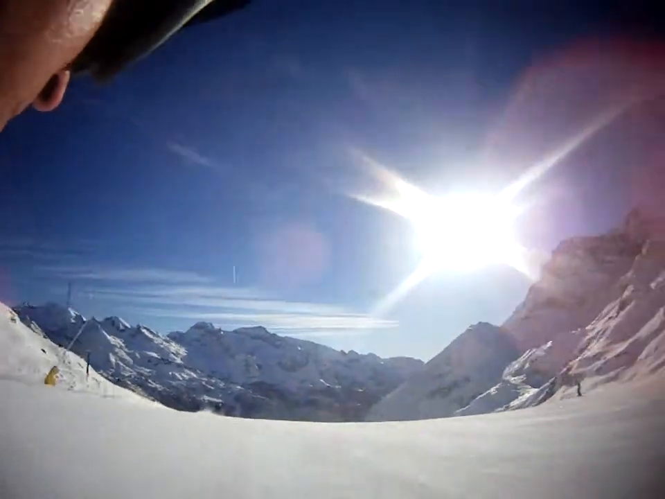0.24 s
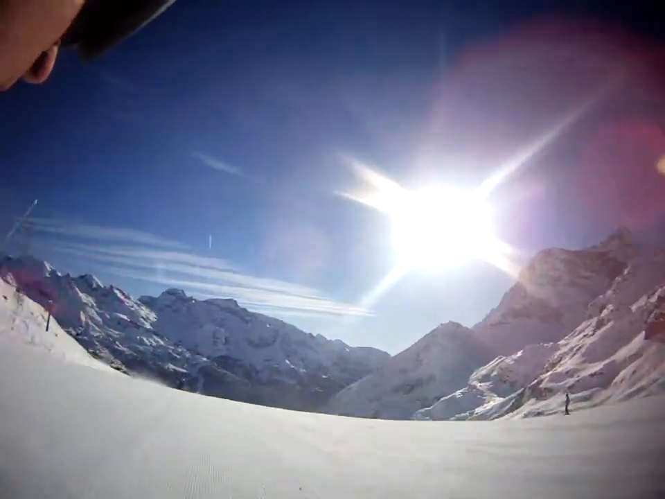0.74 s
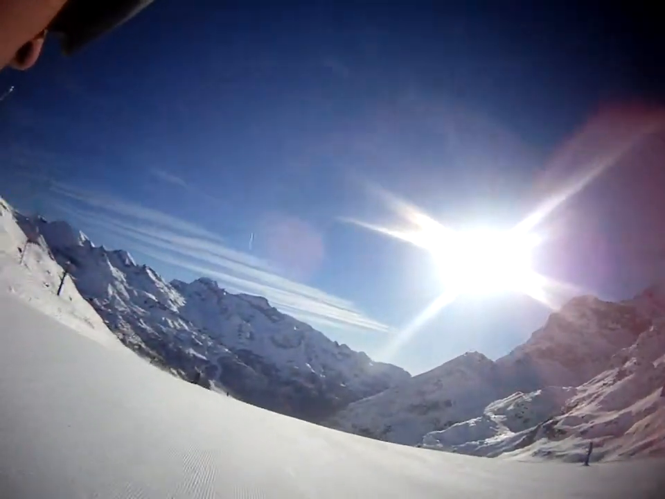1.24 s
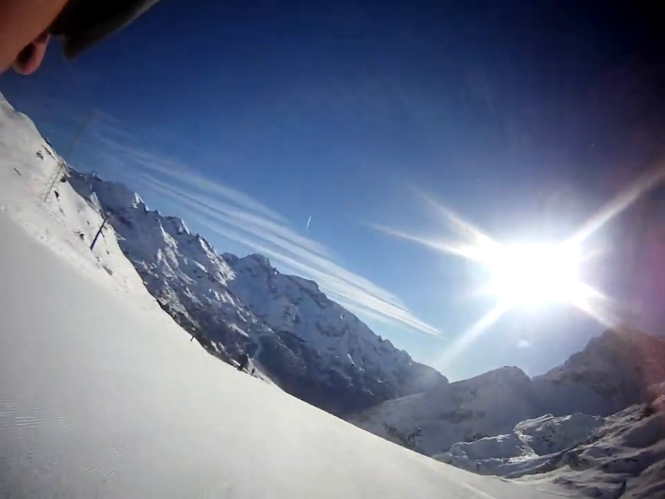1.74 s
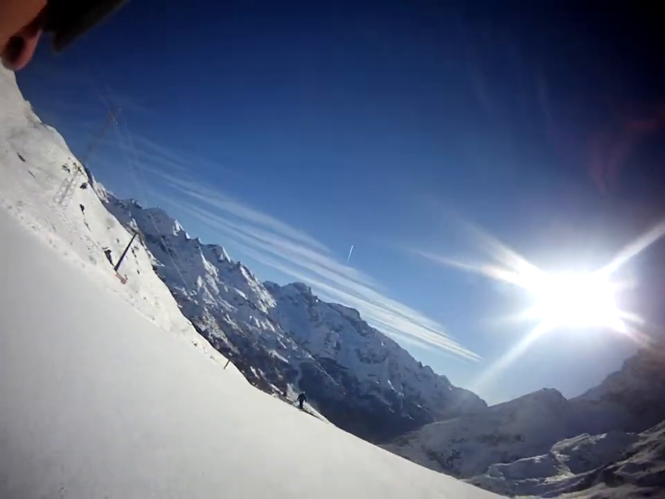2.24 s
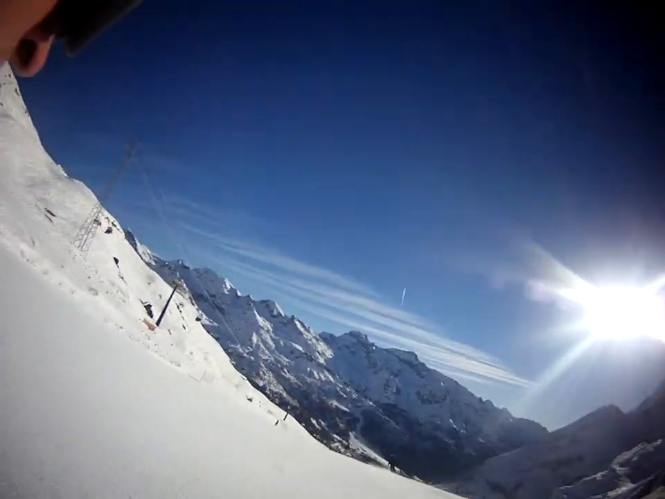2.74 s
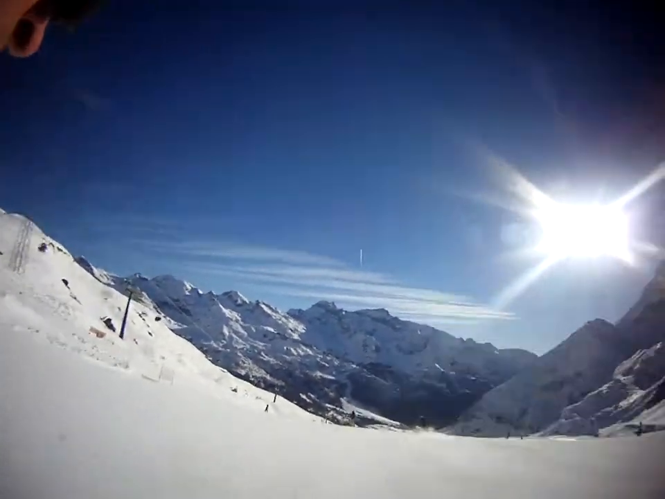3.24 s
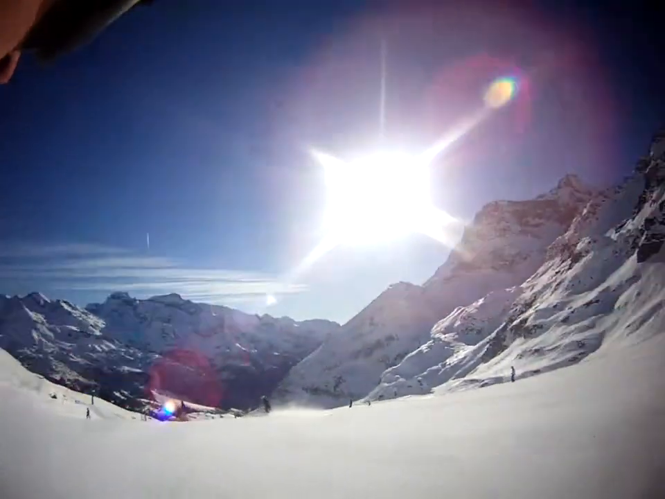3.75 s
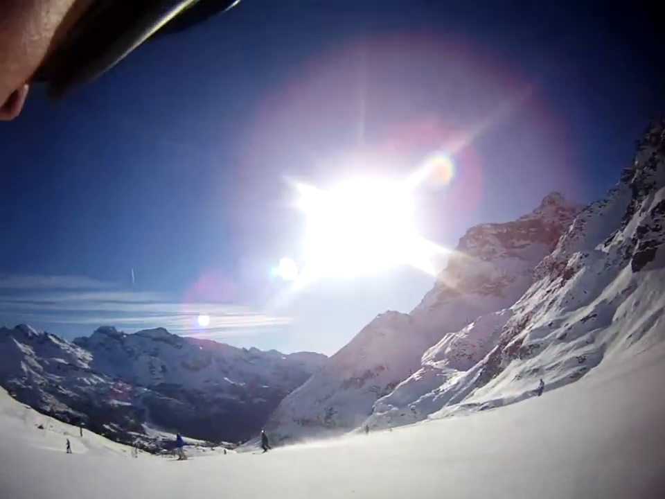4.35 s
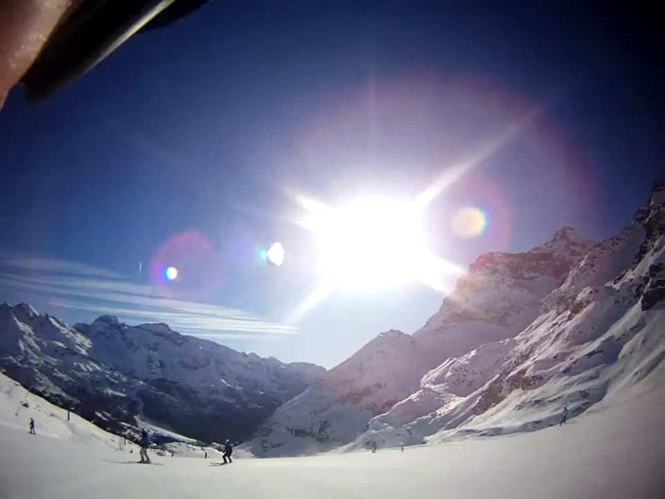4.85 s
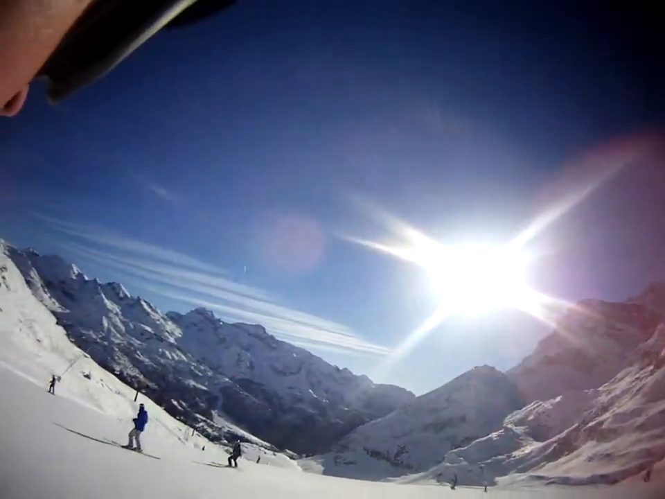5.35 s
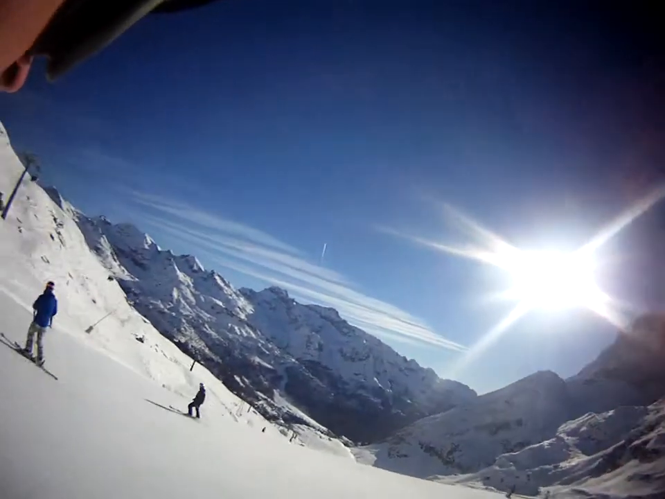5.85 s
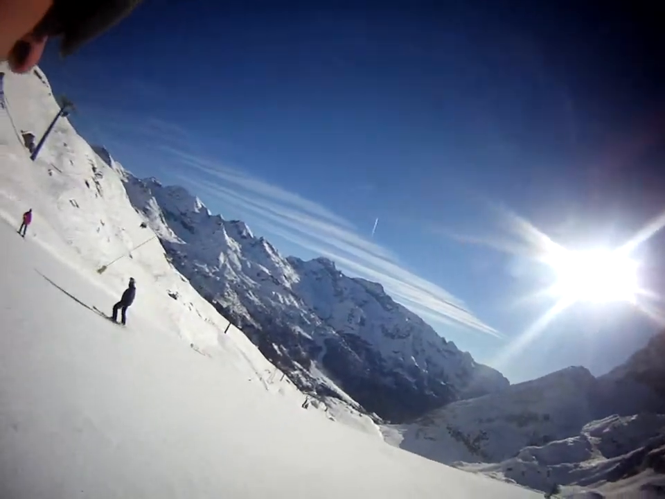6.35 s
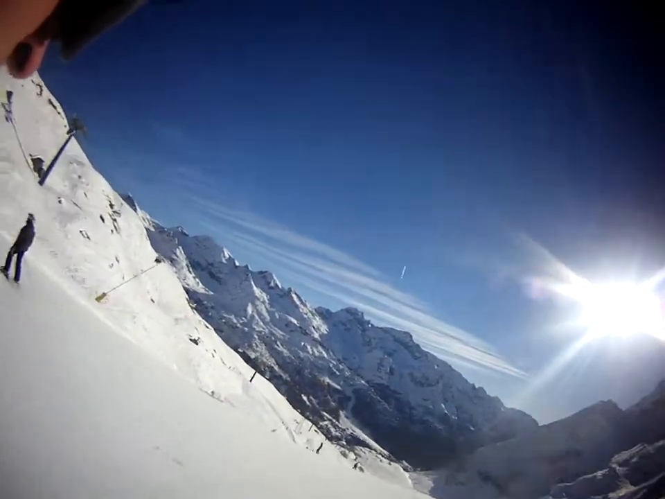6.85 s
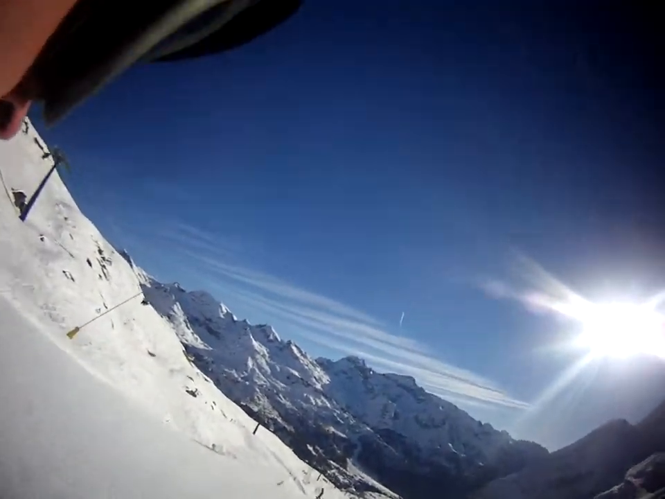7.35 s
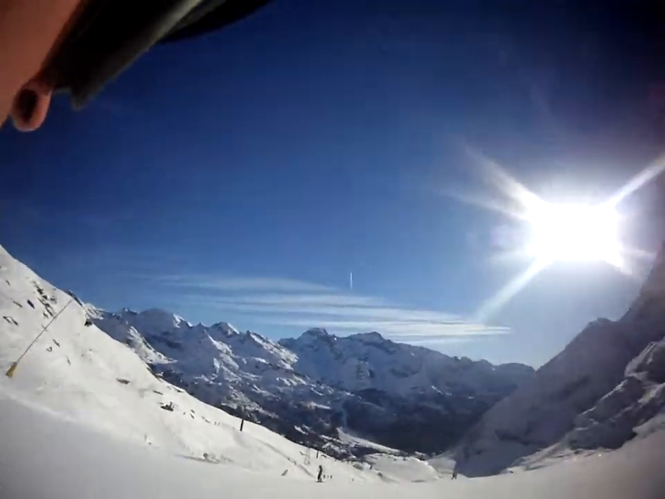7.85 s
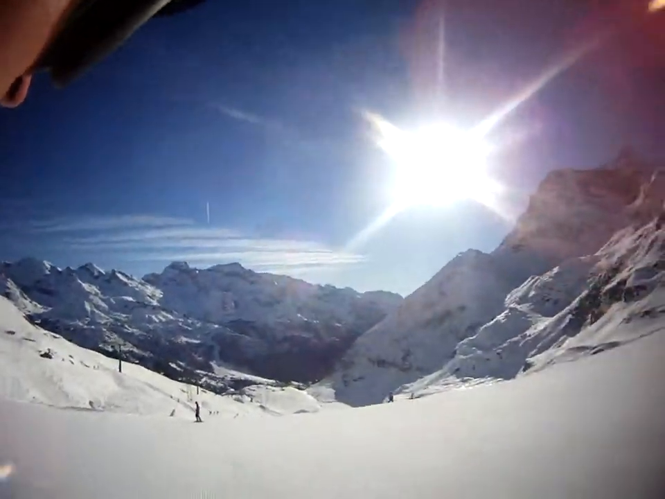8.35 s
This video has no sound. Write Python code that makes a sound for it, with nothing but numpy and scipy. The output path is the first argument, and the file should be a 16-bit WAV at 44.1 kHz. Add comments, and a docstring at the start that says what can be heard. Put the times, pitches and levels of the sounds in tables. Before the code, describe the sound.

A dense, coarse rush of snow under sliding skis starts at once with rattling crunches. The scrape swells around two to three seconds, eases, returns near five, drops quieter, then bites again from six to seven. Muffled helmet bumps come in the middle and a stronger cluster near six seconds. The boxy helmet microphone colours everything nasal and hollow, with only subdued wind outdoors.

```python
"""Fast skiing on hard-packed snow

Skis run over hard snow, heard by a helmet camera in a plastic case, with faint hiss and whine beneath.
Shaped noise makes the dull glide, the mid-pitched skid and, with random impulses, edge scrape and spray.
Decaying noise bursts make bites into the crust and thuds through the helmet; single impulses make ticks.
Wind is low noise with a narrow hum; the resonances of the case shift with the lean for snow and ticks."""
import sys
import numpy as np
from scipy import signal
from scipy.fft import rfft, irfft, next_fast_len
from scipy.io import wavfile
from scipy.ndimage import uniform_filter1d, map_coordinates

SR = 44100
rng = np.random.default_rng(int(sys.argv[2]) if len(sys.argv) > 2 else 0)


def output_pcm(signal):
    """Save a mono or channel-first signal as 16-bit PCM at the path in sys.argv[1].

    Samples are clipped to [-1, 1] before scaling.
    """
    pcm = np.clip(np.atleast_2d(signal).T, -1, 1) * 32767
    wavfile.write(sys.argv[1], SR, np.round(pcm).astype(np.int16))


N = 379260  # length [samples]


def amp(db):
    """Decibel law: 20 dB is a tenfold amplitude."""
    return 10 ** (np.asarray(db) / 20)


def unit(x):
    """Normalisation to unit rms."""
    return x / np.sqrt(np.mean(x ** 2) + 1e-20)


def curves(rows):
    """Linear interpolation in time: one value per sample for each column after the time."""
    times, *columns = np.transpose(rows)
    return [np.interp(np.arange(N) / SR, times, column) for column in columns]


def wobble(rate):
    """Band-limited random modulation: a smooth curve of rms 1 through rate random knots a second."""
    knots = rng.standard_normal(int(N * rate / SR) + 4)
    return unit(map_coordinates(knots, [np.arange(N) * rate / SR]))


# resonances and notches of the case:
# (centre [Hz], width [Hz], gain leaning right [dB], gain leaning left [dB])
CASE_RESONANCES = [(612.4, 109, 8.5, 7.5), (1270, 180, 6, 3.5), (1965, 324, 5, 5.5), (2230, 380, -4, -7),
                   (2654, 454, 13, 15), (3140, 110, -7, -3.5), (3550, 560, 8.5, 11.5), (3830, 210, 2, 0.5),
                   (4370, 180, 1, -6), (4470, 160, -3.5, 3), (4850, 400, 2, 7.5), (5075, 340, 9, 3),
                   (5480, 470, 2.5, 4), (6000, 280, -1.5, -6.5), (6510, 350, 5, 1), (6770, 490, -0.5, 8.5),
                   (7550, 340, -6.5, -5), (8270, 400, -2.5, -2.5), (9200, 690, 1, -5),
                   (9800, 670, -6, -1.5), (10600, 810, 0.5, 0.5)]
# the skier leans from turn to turn: (time [s], lean [0 right to 1 left])
LEAN_CURVE = [(0, 0.3), (.4, .05), (1.1, 0.17), (1.5, 0.6), (2.4, 0.84), (3.25, 0.88), (3.6, 0.093),
              (5.25, 0.055), (5.65, 0.92), (6.9, 0.97), (7.1, .7), (7.7, 0.29), (8.1, 0.16), (8.6, .15)]


def coloured(x, points, case=True):
    """Minimum-phase filtering: x takes a (Hz, dB) colour, with the case resonances blended by the lean."""
    m = 2 * next_fast_len(N // 2 + SR // 4, True)
    f = np.fft.rfftfreq(m, 1 / SR)
    hz, db = np.transpose(points)
    db = np.interp(np.log(f + 1), np.log(hz + 1), db)
    db = np.tile(db, (2, 1))  # one row for each side
    if case:
        for centre, width, *side_gains in CASE_RESONANCES:
            db = db + np.outer(side_gains, 1 / (1 + (2 * (f - centre) / width) ** 2))
    # folding the cepstrum onto positive times makes the response causal
    cepstrum = irfft(np.log(amp(db)), m)
    cepstrum[:, 1:m // 2] *= 2
    cepstrum[:, m // 2 + 1:] = 0
    response = np.exp(rfft(cepstrum))
    right, left = irfft(rfft(x, m) * response, m)[:, :N]
    lean = np.clip(curves(LEAN_CURVE)[0], 0, 1)
    return (1 - lean) * right + lean * left


def patchy(patchy_db):
    """Granular noise: white noise with patches of random gain in time and frequency."""
    spectrum = signal.stft(rng.standard_normal(N), nperseg=512)[2]
    field = uniform_filter1d(rng.standard_normal(spectrum.shape), size=8, axis=0)  # along frequency
    field = uniform_filter1d(field, size=10, axis=1)  # along time
    return signal.istft(spectrum * amp(patchy_db * unit(field)), nperseg=512)[1][:N]


def crystals(density, spread_db):
    """Shot noise of breaking snow crystals: random impulses of uneven size, density a second on average."""
    hit = rng.random(N) < density / SR
    return unit(hit * rng.standard_normal(N) * amp(spread_db * rng.exponential(size=N)))


# the edges load and unload through the turns: (time [s], scrape level [dB], spray level [dB])
EDGE_LEVELS = [(0.0, -32.5, -44.5), (0.74, -29.5, -43.5), (1.34, -34.5, -52), (1.82, -31.5, -46),
               (1.94, -27, -41.5), (2.06, -30, -43), (2.39, -25, -37.5), (3.16, -28, -42.5),
               (3.4, -35, -50.5), (3.57, -33, -53.5), (3.86, -32.5, -45), (4.36, -34, -47),
               (4.48, -30, -45), (4.62, -33.5, -45), (4.96, -27.5, -42.5), (5.08, -35.5, -51),
               (5.44, -39.5, -56.5), (5.51, -43.5, -60), (5.75, -40.5, -55), (5.77, -36, -51.5),
               (6.01, -29, -43), (6.73, -31, -43), (6.82, -27, -42.5), (6.97, -34, -46), (7.04, -28, -41.5),
               (7.45, -40, -55.5), (7.54, -35, -49), (8.09, -39, -55), (8.34, -34.5, -47),
               (8.6, -33, -45.5)]
# the bases slide: (time [s], glide level [dB], sideways skid level [dB])
SLIDE_LEVELS = [(0.0, -33.5, -32), (0.04, -32.5, -29), (0.14, -35, -36.5), (0.43, -33, -25),
                (0.5, -34.5, -29), (0.55, -31.5, -23), (0.79, -33, -28), (1.12, -34, -29),
                (1.63, -35, -36.5), (1.92, -35, -32), (2.42, -33.5, -28.5), (2.44, -35.5, -32.5),
                (3.19, -34.5, -29.5), (3.23, -35.5, -33.5), (3.4, -35.5, -32.5), (3.57, -34, -28.5),
                (4.26, -35.5, -36.5), (4.67, -36, -35), (5.56, -39.5, -43), (6.03, -37.5, -34.5),
                (6.08, -33, -30.5), (6.27, -37.5, -35), (7.11, -40, -35.5), (7.21, -42, -38),
                (7.5, -36.5, -34), (7.86, -39, -35), (8.21, -34, -30), (8.6, -35.5, -39)]
# spectra before the case resonances: (frequency [Hz], relative spectral density [dB per Hz])
GLIDE_COLOUR = [(60, -53), (300, -23.5), (500, -15), (900, -3), (1500, 0), (2300, -5), (3200, -11.5),
                (5000, -20.5), (9000, -36.5), (16000, -70)]
SCRAPE_COLOUR = [(300, -78.5), (1000, -6.5), (2300, -12.5), (3200, -2), (4400, 0), (5800, -4.5),
                 (7500, -17.5), (11000, -36), (16000, -48)]
SPRAY_COLOUR = [(2000, -24), (5000, -3.5), (7500, 0.5), (9500, -6), (12000, -16), (14000, -23.5),
                (16000, -25)]


def skis():
    """Friction noise modulated by flexure: the ski loads and unloads its edge about 26 times a second."""
    scrape_db, spray_db = curves(EDGE_LEVELS)
    glide_db = curves(SLIDE_LEVELS)[0]
    flex_hz = 26 + 4 * wobble(5)
    flex = np.sin(2 * np.pi * np.cumsum(flex_hz) / SR) * (1 + .5 * wobble(4.08))
    grit, ripples = wobble(120), wobble(12)

    glide = patchy(patchy_db=1.2) * amp(0.28 * flex + 0.49 * wobble(9))
    glide = unit(coloured(glide, GLIDE_COLOUR))

    edge = unit(patchy(patchy_db=1.03)) + 0.61 * crystals(2500, spread_db=1.08)
    edge = edge * amp(1.6 * flex + 0.23 * grit + 0.73 * ripples)
    scrape = unit(coloured(edge, SCRAPE_COLOUR))

    spray = unit(patchy(patchy_db=1.5)) + 0.49 * crystals(4700, spread_db=1.5)
    flutter_db = 0.38 * wobble(160) + 1.1 * wobble(240)
    spray = spray * amp(0.36 * flex + 0.8 * grit + 0.72 * ripples + flutter_db)
    spray = unit(coloured(spray, SPRAY_COLOUR))
    return amp(glide_db) * glide + amp(scrape_db) * scrape + amp(spray_db) * spray


# snow ploughed sideways, before the case resonances:
# (frequency [Hz], relative spectral density [dB per Hz])
PLOUGH_COLOUR = [(700, -37.5), (1500, -7), (2000, -2), (2500, -5.5), (3100, -5.5), (4500, -21),
                 (9000, -70.5)]


def skid():
    """Broadband friction noise: a mid-pitched rush of snow ploughed by the skis sliding sideways."""
    snow = patchy(patchy_db=-0.06) * amp(0.7 * wobble(25) + 0.57 * wobble(9.5))
    return amp(curves(SLIDE_LEVELS)[1]) * unit(coloured(snow, PLOUGH_COLOUR))


# an edge bites into the crust: (time [s], nominal peak level [dB], centre [Hz])
EDGE_BITES = [(0.0252, -7.5, 3570), (0.0642, -11, 3790), (0.1355, -14, 4930), (0.2033, -8, 5060),
              (0.2452, -18, 3500), (0.2622, -5.5, 5230), (0.2977, -9, 4850), (0.3665, -8, 3560),
              (0.8814, -13, 4990), (1.028, -11, 3330), (1.0993, -21, 3530), (1.5119, -10, 3480),
              (1.5917, -16, 3470), (1.8426, -9, 3450), (1.9529, -16, 3500), (2.1539, -21, 3490),
              (2.1928, -15, 3580), (2.2297, -9, 4960), (2.3684, -14, 3560), (2.4817, -13, 4800),
              (2.562, -13, 3510), (2.601, -14, 3510), (2.7236, -16, 3580), (2.8354, -8, 3510),
              (2.9202, -17, 4890), (3.002, -13, 3520), (3.0339, -6, 3700), (3.1791, -9, 3550),
              (3.205, -14, 3450), (3.8679, -8, 3630), (3.9049, -10.5, 5100), (4.1429, -12, 3530),
              (4.3939, -10.5, 5010), (4.8463, -12, 3490), (4.9301, -10, 3870), (5.899, -18, 3430),
              (6.0047, -14, 3830), (6.081, -10, 3500), (6.332, -18, 3610), (6.3808, -10, 5010),
              (6.4571, -13, 3610), (6.541, -12, 3500), (7.0416, -14.5, 3520), (7.0737, -9, 4740),
              (7.1066, -7, 3570), (7.7282, -10, 3560), (8.488, -6.5, 5130)]
BITE_T60_S, BITE_CREST_DB = 0.069, 17.5  # decay by 60 dB, nominal peak over rms
BITE_SPRAY_DB = -28  # puff of crystals, relative to the crunch
SMALL_BITES, SMALL_DB, SMALL_SPREAD_DB = 60, -6, 6.5  # count, mean level over the scrape, scatter either way


def bites():
    """Impulsive fracture: a click and short crunch, strongest near its own pitch; small ones are random."""
    drive, t = np.zeros(N + SR), np.arange(SR // 4) / SR
    when, size, pitch = rng.random((SMALL_BITES, 3)).T
    scrape_db = curves(EDGE_LEVELS)[0][(when * (N - 1)).astype(int)]
    small_db = scrape_db + BITE_CREST_DB + SMALL_DB + SMALL_SPREAD_DB * (2 * size - 1)
    small_bites = zip(when * N / SR, small_db, 3400 + 1700 * pitch ** 3)
    rows = list(EDGE_BITES) + list(small_bites)
    for (s, db, hz), crunch in zip(rows, rng.standard_normal((len(rows), len(t)))):
        crunch = crunch * (1 - np.exp(-t / 0.0024)) + 2.1 * (t == 0)  # soft attack, then the click
        crunch = crunch + 1.48 * signal.lfilter(*signal.iirpeak(hz, 4.5, SR), crunch)
        drive[round(s * SR):][:len(t)] += amp(db - BITE_CREST_DB - 60 * t / BITE_T60_S) * crunch
    white = rng.standard_normal(N)
    out = np.zeros(N)
    for colour, db in [(SCRAPE_COLOUR, 0), (SPRAY_COLOUR, BITE_SPRAY_DB)]:
        # dividing by the filter's gain on white noise keeps the levels independent of the colour
        out += amp(db) * coloured(drive[:N], colour) / np.std(coloured(white, colour))
    return out


# something hard ticks against the case: (time [s], level [dB], the loudest row being the peak of all)
CASE_TICKS = [(0.0258, -22), (0.263, -13), (1.5914, -19), (1.6841, -23), (1.7195, -22), (1.954, -11),
              (1.9624, -14), (3.5987, -21), (4.8469, -20), (4.9307, -16), (5.0074, -19), (5.6705, -23),
              (5.9076, -17), (6.1094, -21), (6.1644, -20), (7.1774, -18), (7.7293, -18)]
# a tick before the case resonances: (frequency [Hz], relative spectral density [dB per Hz])
TICK_COLOUR = [(500, -11), (1500, -10), (3200, -3), (5000, 5.5), (7000, -10), (12000, -35), (16000, -52)]


def ticks():
    """Impulse response: single blows set the case ringing for a few milliseconds."""
    s, db = np.transpose(CASE_TICKS)
    blows = np.zeros(N)
    blows[np.round(s * SR).astype(int)] = amp(db)
    ring = coloured(blows, TICK_COLOUR)
    return amp(db.max()) * ring / np.abs(ring).max()


# bumps carried through the helmet, levels before attack and decay, width that of one of two equal filters:
# (time [s], level [dB], 60 dB decay time [s], centre [Hz], width [Hz])
HELMET_THUDS = [(.537, -38, 0.065, 350, 600), (.611, -41, 0.055, 350, 600), (3.592, -33, 0.041, 300, 600),
                (4.332, -30, 0.1, 420, 750), (4.42, -35, 0.067, 280, 800), (4.505, -28, 0.068, 420, 750),
                (4.58, -32.5, 0.082, 422, 750), (4.655, -38, .06, 330, 800), (5.585, -35, 0.1, 650, 120),
                (5.71, -39, 0.11, 615, 100), (5.76, -37, 0.087, 630, 100), (5.93, -24, 0.055, 1100, 600),
                (6.015, -21.5, 0.056, 1100, 700), (6.065, -22.5, 0.067, 870, 895), (6.151, -49, .2, 88, 30)]


def thuds():
    """Damped resonance: each bump is a dull knock, a decaying puff of band-passed noise."""
    out, t = np.zeros(N + SR), np.arange(SR // 4) / SR
    puffs = rng.standard_normal((len(HELMET_THUDS), len(t)))
    for (s, db, t60, hz, width_hz), puff in zip(HELMET_THUDS, puffs):
        band = signal.iirpeak(hz, hz / width_hz, SR)
        puff = unit(signal.lfilter(*band, signal.lfilter(*band, puff)))
        attack = 1 - np.exp(-t / 0.011)
        out[round(s * SR):][:len(t)] += amp(db - 60 * t / t60) * attack * puff
    return out[:N]


# wind pressure on the case: (time [s], buffet level [dB])
BUFFET_LEVEL = [(0.0, -53), (0.76, -75), (0.79, -63), (1.51, -80), (2.13, -62), (3.26, -76), (3.81, -57),
                (5.44, -66.5), (5.58, -82), (5.87, -73), (7.21, -68), (7.38, -85), (7.59, -65), (8.17, -68),
                (8.24, -58), (8.6, -62)]
# wind spectra: (frequency [Hz], relative spectral density [dB per Hz])
BUFFET_COLOUR = [(8, -8), (25, 4.5), (45, -1), (80, -23), (200, -51)]
ROAR_COLOUR = [(30, -18), (70, -3.5), (110, -6.5), (250, -2.5), (450, 0), (900, -1.5), (3000, -65)]
ROAR_DB = -22.5  # relative to the glide: both grow with speed


def wind():
    """Turbulent pressure: eddies push on the case in lumps, over a steadier low roar."""
    lumps = rng.standard_normal(N) * amp(2.2 * wobble(12))
    buffet = unit(coloured(lumps, BUFFET_COLOUR, case=False))
    roar = patchy(patchy_db=1.5) * amp(1.5 * wobble(20))
    roar = unit(coloured(roar, ROAR_COLOUR, case=False))
    return amp(curves(BUFFET_LEVEL)[0]) * buffet + amp(curves(SLIDE_LEVELS)[0] + ROAR_DB) * roar


# wind humming across an opening: (time [s], level [dB])
HUM_LEVEL = [(0.0, -49), (0.24, -54), (0.31, -47.5), (2.18, -59.5), (3.93, -52), (5.87, -67), (5.96, -65),
             (6.85, -59), (8.58, -55), (8.6, -67)]
# resonance of the hum, one of two equal filters: (centre [Hz], width [Hz])
HUM_RESONANCE = (745, 29)


def hum():
    """Resonance driven by noise: two sharp filters in series leave a narrow, fuzzy tone."""
    hz, width_hz = HUM_RESONANCE
    b, a = signal.iirpeak(hz, hz / width_hz, SR)
    tone = signal.lfilter(b, a, signal.lfilter(b, a, rng.standard_normal(N)))
    return amp(curves(HUM_LEVEL)[0]) * unit(tone)


# whine of the electronics: (frequency [Hz], rms level [dB])
WHINE_TONES = [(14987, -89)]
# microphone hiss: (frequency [Hz], relative spectral density [dB per Hz])
HISS_COLOUR = [(300, -20), (2000, -2), (9000, -9), (16000, -1)]


def camera():
    """Electronic self-noise: steady hiss and a very faint high whine."""
    out = amp(-74) * unit(coloured(rng.standard_normal(N), HISS_COLOUR, case=False))
    for hz, db in WHINE_TONES:
        out = out + amp(db) * np.sqrt(2) * np.sin(2 * np.pi * hz * np.arange(N) / SR)
    return out


def scene():
    """Superposition: the pressures of all sources add at one microphone."""
    snow = skis() + skid() + bites()
    return (snow + ticks() + thuds() + wind() + hum() + camera())[None]


TOP_HZ = 15300  # band limit of the camera


def record(dry):
    """Band limitation: the camera keeps nothing above its top frequency."""
    m = next_fast_len(N + SR // 2)
    passed = np.fft.rfftfreq(m, 1 / SR) < TOP_HZ
    return irfft(rfft(dry, m) * passed, m)[:, :N]


dry = scene()
out = record(dry)
output_pcm(out)
```